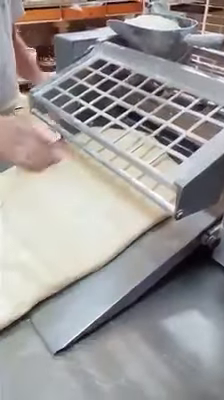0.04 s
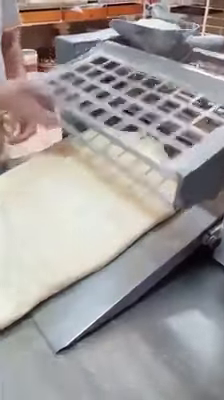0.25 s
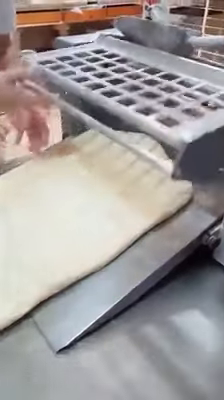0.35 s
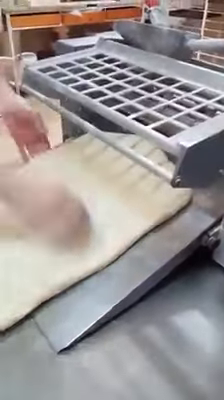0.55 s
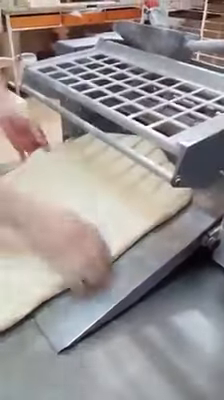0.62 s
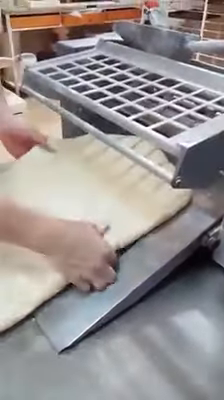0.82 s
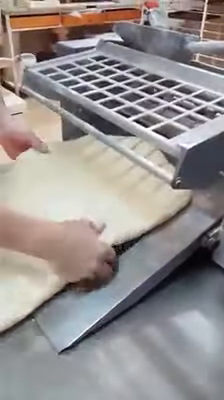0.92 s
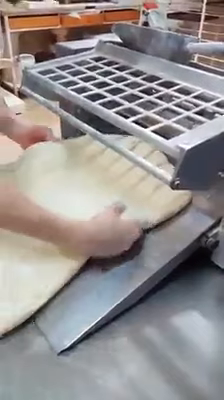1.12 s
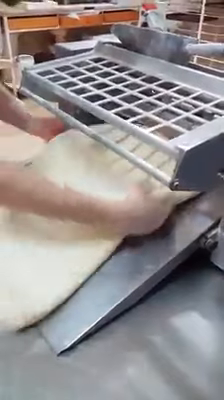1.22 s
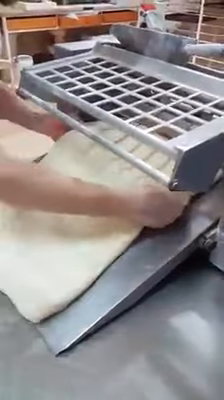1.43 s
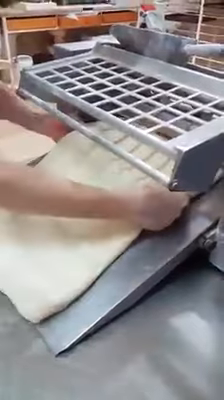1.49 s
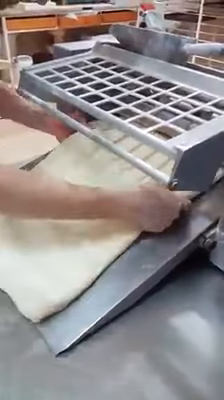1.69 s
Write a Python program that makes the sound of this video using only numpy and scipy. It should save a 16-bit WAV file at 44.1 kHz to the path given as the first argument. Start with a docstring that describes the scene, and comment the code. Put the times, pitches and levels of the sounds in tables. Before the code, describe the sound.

A metal wire guard clacks sharply and rattles to rest over a humming dough sheeter

```python
"""A dough sheeter hums and rumbles in a bakery; its wire guard swings up, ticks, clacks and rattles to rest.
Wavering sines make the drive, coloured noise the belt, the sliding dough and a thin hiss on the right.
Scuffs are gritty noise bursts, the hinge a wobbling sine; blows ring the guard's modes and wires,
jolts boom in the steel housing, and a decaying noise tail makes the room.
Later a hand pats the dough and rubs along it, and something brushes the metal."""
import sys
import numpy as np
from scipy import signal
from scipy.fft import rfft, irfft
from scipy.io import wavfile
from scipy.ndimage import uniform_filter1d

SR = 44100
rng = np.random.default_rng(int(sys.argv[2]) if len(sys.argv) > 2 else 0)


def dump_mix(stems):
    """Bounce the given channels to the path in sys.argv[1] as a 16-bit WAV at rate SR."""
    frames = np.atleast_2d(stems).T  # one column per channel
    limited = np.clip(frames, -1, 1)  # hard clip at full scale
    pcm = np.round(limited * 32767).astype(np.int16)
    wavfile.write(sys.argv[1], SR, pcm)


N = 77175


def undb(db):
    """Decibels to amplitude factor."""
    return 10 ** (np.asarray(db) / 20)


def clock():
    """Time of every sample in seconds."""
    return np.arange(N) / SR


def curve(rows):
    """Straight lines through (time [s], value) points."""
    return np.interp(clock(), *np.array(rows).T)


def at_hz(rows, hz):
    """Read (frequency [Hz], value) points on a log-frequency axis."""
    f, v = np.array(rows).T
    return np.interp(np.log(np.maximum(hz, 1)), np.log(f), v)


def colour(x, rows):
    """Filter by (frequency [Hz], gain [dB]) points."""
    gain = undb(at_hz(rows, np.fft.rfftfreq(N, 1 / SR)))
    return irfft(rfft(x) * gain, N)


def tilted(rows, tilt_db):
    """Lean a colour about 3 kHz by so many dB per octave: harder contacts are brighter."""
    return [(hz, db + tilt_db * np.log2(hz / 3000)) for hz, db in rows]


def noise(rows):
    """Coloured stereo noise of rms 1, alike in the bass and wide in the treble."""
    # spread between the ears: (frequency [Hz], side minus mid [dB])
    ear_spread = [(60, -109), (180, -14), (350, -8), (700, -10.5), (1400, -2.5), (3000, -3), (10000, -0.5)]
    mid, side = rng.standard_normal((2, N))
    stereo = mid + colour(side, ear_spread) * np.array([[1], [-1]])
    x = colour(stereo, rows)
    return x / x.std()


def walk(rate):
    """Slow chance with a spread of 1: white noise averaged twice over 1 / rate seconds."""
    k = int(SR / rate)
    x = uniform_filter1d(rng.standard_normal(N), k, mode="wrap")
    x = uniform_filter1d(x, k, mode="wrap")
    return (x - x.mean()) / x.std()


def fade(t60):
    """Exponential decay that falls 60 dB in t60 seconds."""
    return np.exp(-np.log(1000) * clock() / max(t60, 1e-3))


def unit(x):
    """Scale to unit energy per channel, averaged over the channels."""
    return x / np.sqrt(np.mean(np.sum(x ** 2, axis=-1)))


def pan(db):
    """Gains that make the left ear louder than the right by db."""
    return undb(np.array([[db], [-db]]) / 2)


def start(x, s):
    """Delay a sound to s seconds."""
    k = int(np.clip(s * SR, 0, N - 1))
    return np.pad(x, ((0, 0), (k, 0)))[:, :N]


def burst(rows, t60, attack):
    """Decaying noise: many close resonances set off by one contact."""
    swell = 1 - np.exp(-clock() / attack)
    return unit(noise(rows) * fade(t60) * swell)


def grains(per_s, length_s):
    """Envelope of irregular small contacts, rms 1: random hits, each decaying exponentially."""
    chance, size = rng.random(N), rng.uniform(.3, 1, N)
    hits = (chance < per_s / SR) * size ** 2
    power = signal.lfilter([1], [1, -np.exp(-2 / (length_s * SR))], hits)
    return np.sqrt(power / power.mean())


def tone(hz, db, pan_db):
    """A sine that wavers in pitch and in the phase between the ears."""
    waver_hz, ear_lag = 1.25, 0.13  # ear_lag in radians at 500 Hz
    phase = 2 * np.pi * np.cumsum(hz + waver_hz * walk(9.9)) / SR + rng.uniform(0, 2 * np.pi)
    lag = ear_lag * hz / 500 * walk(1.6) * np.array([[1], [-1]])
    return np.sqrt(2) * undb(db) * np.sin(phase + lag) * pan(pan_db)


def machine():
    """Drive tones and belt noise follow the load; the motor tone throbs above them."""
    # drive tones: (frequency [Hz], rms level before waver and load [dB], left minus right [dB])
    drive_tones = [(96, -59, -1), (114, -55, 1), (154, -54, 0), (199, -50, -3), (216, -54, 4),
                   (301, -48, -1), (349, -45, -2), (432, -49, -1), (500, -58, 3), (582, -52.5, 4),
                   (598, -50.5, -5), (628, -51, -3), (678, -55, -2), (764, -51, 4), (783, -53.5, -2),
                   (829, -54, -2), (882, -54, 0), (1232, -66.5, -2)]
    # belt and roller noise: (frequency [Hz], relative density [dB per Hz])
    belt_colour = [(25, 16), (45, -13), (70, -4), (110, -2), (200, 0), (300, 1.5), (400, 6.5), (490, -5.5),
                   (620, -1), (720, -3.5), (800, -2), (970, -2.5), (1150, -16), (2300, -18.5), (3600, -23),
                   (4600, -32.5), (6500, -39), (8000, -50.5), (12000, -78), (15500, -71)]
    # effort of the machine: (time [s], level [dB])
    load = [(0, 0.5), (.25, 3), (.7, 2.5), (.9, 1.5), (1.05, 0), (1.25, 3.5), (1.38, 2), (1.55, 0),
            (1.75, 0)]
    # throb of the motor tone: (time [s], level [dB])
    motor_level = [(0, -68), (.12, -36), (.2, -40.5), (.3, -52.5), (.6, -47), (.72, -75), (.92, -50),
                   (1.0, -36), (1.1, -53), (1.35, -36.5), (1.44, -45.5), (1.59, -41), (1.66, -35),
                   (1.75, -40)]
    waver_db = 2.5
    belt = undb(-35) * noise(belt_colour)
    drive = sum(tone(hz, db + waver_db * walk(17.2), pan_db) for hz, db, pan_db in drive_tones)
    motor = tone(393.5, curve(motor_level), pan_db=7)
    return (belt + drive) * undb(curve(load)) + motor


def thin_hiss():
    """Thin steady noise from the right."""
    # (frequency [Hz], relative density [dB per Hz])
    hiss_colour = [(3000, 0), (6500, 6.5), (8000, -3.5), (12000, -7), (13000, -10), (15500, -37)]
    return undb(-70) * noise(hiss_colour) * pan(-17.5)


def dough_slide():
    """The sheet hisses as it slides over the table: noise with a fluttering level."""
    # level before flutter: (time [s], level [dB])
    slide_level = [(0, -53), (.2, -61.5), (.29, -50.5), (.5, -72), (1.05, -55.5), (1.28, -55),
                   (1.41, -50.5), (1.55, -66), (1.75, -56)]
    # (frequency [Hz], relative density [dB per Hz])
    slide_colour = [(600, 13), (1400, -15), (2400, 1.5), (4000, 3.5), (6500, -7.5), (8000, -14),
                    (12000, -21), (15000, -41)]
    flutter_db = 3.2 * walk(24)
    return noise(slide_colour) * undb(curve(slide_level) + flutter_db) * pan(-8)


def scuffs():
    """Short, bright, gritty scrapes on steel: noise bursts broken up by small contacts."""
    # (time [s], level re unit energy [dB], t60 [s], left minus right [dB])
    scrapes = [(0.3212, -0.5, 0.086, -6.5), (.338, -4, 0.12, -3), (1.4175, -11, 0.22, -3),
               (1.431, -15, 0.21, 2)]
    # (frequency [Hz], relative density [dB per Hz])
    scrape_colour = [(500, 5), (1200, 4), (2200, 2), (3200, 3.5), (4200, 7.5), (5200, -0.5), (6500, 0),
                     (8500, -11), (11500, -23), (15000, -24)]
    out = 0
    for s, db, t60, pan_db in scrapes:
        scrape = burst(scrape_colour, t60, attack=0.00056)
        gritty = unit(scrape * (1 + grains(per_s=1000, length_s=.0006)))
        out = out + undb(db) * start(gritty, s) * pan(pan_db)
    return out


def room(x):
    """Hard walls: a diffuse noise tail whose bands die at their own rates, sooner towards the treble's top."""
    # reverberation: (frequency [Hz], t60 [s])
    reverb = [(100, 1), (500, 0.24), (1500, 0.84), (3000, 0.77), (6000, 0.55), (12000, 0.48)]
    build_s = 0.01
    f = np.fft.rfftfreq(N, 1 / SR)
    spectrum = rfft(noise([(20, 0), (20000, 0)]))
    tail = 0
    for hz, t60 in reverb:
        # 1 at this band, sloping to 0 at its neighbours
        band = at_hz([(h, float(h == hz)) for h, _ in reverb], f)
        tail = tail + irfft(spectrum * band, N) * fade(t60)
    tail = unit(tail * (1 - np.exp(-clock() / build_s)))
    mono = x.mean(axis=0)[None]
    return signal.fftconvolve(mono, tail, axes=1)[:, :N]


def hinge():
    """A brief squeak just before the stop: a swelling sine of unsteady pitch."""
    squeak_s, length_s, squeak_hz = .361, 0.014, 4400
    swell = np.sin(np.pi * np.clip((clock() - squeak_s) / length_s, 0, 1))
    pitch = squeak_hz * (1 + 0.05 * walk(1350))
    return undb(-29) * swell * np.sin(2 * np.pi * np.cumsum(pitch) / SR)


def guard():
    """Blows ring the frame's modes and set the wires clattering; returns the plain and the placed sound."""
    # modes of the frame: (frequency [Hz], relative level [dB])
    frame_modes = [(474, -4), (633, -4), (675, -6), (853, -4), (910, -2), (950, 0), (976, 2), (998, -2),
                   (1114, -6), (1195, -2), (1248, -5), (1422, -5), (1524, -5), (1589, -6), (1740, -1),
                   (2072, -3), (2291, -6), (2427, -6), (2516, 2), (2599, -2), (2669, -2), (2725, -4),
                   (2876, -2), (3087, -2), (3224, -5), (3379, 1), (3515, -3), (3556, -2), (3816, -3),
                   (3935, -8), (3983, -6), (4255, -8), (4400, -6), (4840, -9), (5275, -7), (6267, -7),
                   (6413, -9), (6623, -9)]
    # dense clatter of the wires: (frequency [Hz], relative density [dB per Hz])
    wire_colour = [(200, -22), (600, 4), (950, -0.5), (1150, -3), (1300, 5), (1720, 1), (1810, -20),
                   (1900, 2.5), (2200, 5), (2850, 1), (2960, -24), (3100, 5), (3400, -0.5), (3900, 1.5),
                   (4300, -1), (5200, -4), (6000, -3.5), (6600, -4.5), (8000, -14.5), (10200, -21),
                   (11500, -27), (15000, -33)]
    # (time [s], level [dB], tilt [dB per octave], left minus right [dB])
    blows = [(.3712, 4, 1.5, -8.5), (.3765, 7, 3, -4), (.385, 1, 1, -7), (.398, 0, -2.5, 2),
             (.4136, 0, 0.5, -12), (0.4387, 4, 0.3, -8.5), (.447, -4.5, -5, 6), (.466, -7.5, -3, 12.5),
             (.478, -5.5, -3.5, -11), (.492, -12, -3, 10)]
    # the guard on the far, left side: (frequency [Hz], gain [dB])
    left_shade = [(3000, 2.5), (6000, -3), (12000, -9)]
    ring_t60_s, damping = 0.18, 0.44  # ring time at 2 kHz; how fast it shortens with frequency
    wires_t60_s, contact_s, ring_db, mode_jitter = 0.1, 0.00047, -.5, .0008

    # the rattle to rest
    chatter = noise(tilted(wire_colour, -4)) * grains(per_s=140, length_s=.004) * fade(0.62)
    clatter = placed = undb(-33) * start(chatter, .495)

    hz, mode_db = np.array(frame_modes).T
    t = clock()[:N // 2]
    decay = np.log(1000) / ring_t60_s * (hz / 2000) ** damping
    mode_hz = hz * (1 + mode_jitter * rng.standard_normal(len(hz)))
    modes = np.exp(np.outer(2j * np.pi * mode_hz - decay, t)) * (1 - np.exp(-t / contact_s))
    ear_phases = 0.33 * rng.standard_normal((2, len(hz)))
    for s, db, tilt_db, pan_db in blows:
        phases = rng.uniform(0, 2 * np.pi, len(hz)) + ear_phases
        weights = undb(mode_db + tilt_db * np.log2(hz / 3000)) * np.exp(1j * phases)
        ring = np.pad(unit((weights @ modes).imag), ((0, 0), (0, N - len(t))))
        wires = burst(tilted(wire_colour, tilt_db), wires_t60_s, contact_s)
        blow = undb(db) * start(wires + undb(ring_db) * ring, s)
        clatter = clatter + blow
        placed = placed + blow * pan(pan_db)
    return clatter, np.array([colour(placed[0], left_shade), placed[1]])


def housing():
    """Jolts boom briefly in the sheet-steel body: decaying low modes with a dull knock."""
    # body modes: (frequency [Hz], relative level [dB], t60 [s])
    body_modes = [(85, -19, .2), (114, -16, .3), (172, -5, .3), (252, 4, .24), (272, -2, .15),
                  (305, -6, .1), (346, 1, .14)]
    # dull knock: (frequency [Hz], relative density [dB per Hz])
    knock_colour = [(30, -38), (75, -13), (130, -12), (175, -6), (260, 6), (340, 5), (430, -7), (700, -7),
                    (970, 2), (1600, -30), (5000, -69)]
    # jolts that reach the body: (time [s], level [dB])
    jolts = [(.377, 11), (.392, 7), (.411, 4), (.444, 7), (.463, -2), (0.487, 5)]
    swell = 1 - np.exp(-clock() / 0.0043)
    out = 0
    for s, db in jolts:
        phases = rng.uniform(0, 2 * np.pi, len(body_modes))
        boom = 0
        for (hz, mode_db, t60), phase in zip(body_modes, phases):
            boom = boom + undb(mode_db) * fade(t60) * np.sin(2 * np.pi * hz * clock() + phase)
        knock = undb(-2) * burst(knock_colour, t60=0.084, attack=0.0012)
        out = out + undb(db) * start(unit(boom * swell) + knock, s)
    return out


def dough_rub():
    """A hand rubs along the dough: soft noise that swells and sinks."""
    # (time [s], level [dB])
    rub_level = [(1.29, -80), (1.315, -59), (1.36, -51), (1.41, -39), (1.46, -39.5), (1.52, -50.5),
                 (1.62, -50.5)]
    # (frequency [Hz], relative density [dB per Hz])
    rub_colour = [(400, -21), (900, 9.5), (1400, -5), (2200, -2), (3200, -17), (4500, -17), (8000, -40)]
    return noise(rub_colour) * undb(curve(rub_level)) * pan(2)


def dough_pats():
    """A hand pats the dough: dull noise bursts with a quick attack."""
    # (time [s], level re unit energy [dB], t60 [s])
    pats = [(1.3139, -0.5, 0.13), (1.342, -5, 0.31), (1.403, -16, 0.019), (1.501, -12.5, 0.047),
            (1.590, -12.5, 0.03)]
    # (frequency [Hz], relative density [dB per Hz])
    pat_colour = [(80, -12), (350, 12), (600, 10), (820, 13), (1200, 2), (1800, -7), (3000, -11),
                  (5000, -25), (8000, -38), (15000, -60)]
    return sum(undb(db) * start(burst(pat_colour, t60, attack=0.00072), s) for s, db, t60 in pats)


def scene():
    """Mix every source; guard, housing and scuffs also feed the room."""
    clatter, placed = guard()
    body, scrapes = housing(), scuffs()
    walls = room(undb(-2) * clatter + undb(-15) * body + undb(-0.5) * scrapes)
    dough = dough_slide() + dough_rub() + dough_pats()
    return machine() + thin_hiss() + dough + scrapes + hinge() + placed + body + walls


def record(dry):
    """A high-pass thins the deep bass and a steep low-pass cuts the top."""
    low_cut = signal.butter(3, 56, "high", fs=SR, output="sos")
    top_cut = signal.ellip(10, .2, 80, 15650, fs=SR, output="sos")
    # a mirrored lead-in lets the filters settle
    led_in = np.pad(dry, ((0, 0), (N // 10, 0)), mode="reflect")
    settled = signal.sosfilt(np.vstack([low_cut, top_cut]), led_in)
    return settled[:, -N:]


dry = scene()
out = record(dry)
dump_mix(out)
```